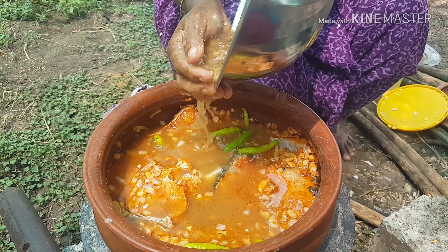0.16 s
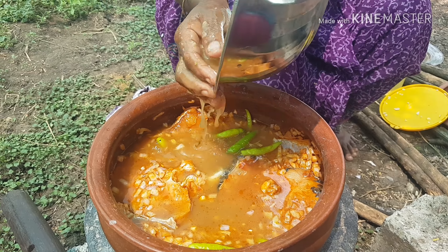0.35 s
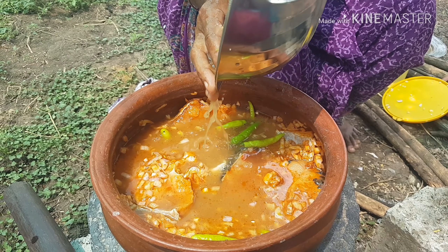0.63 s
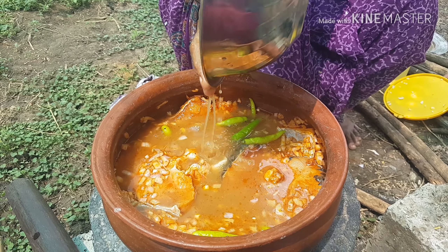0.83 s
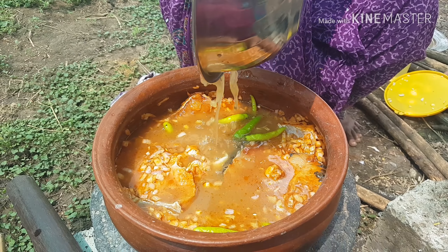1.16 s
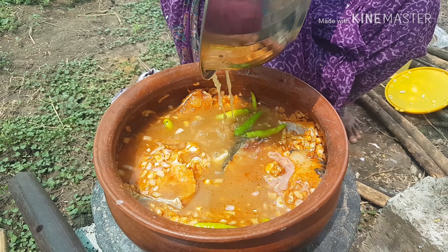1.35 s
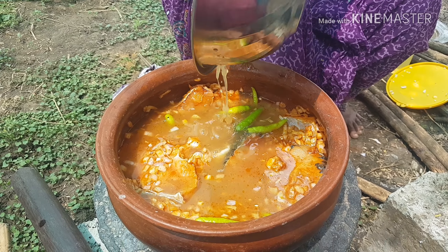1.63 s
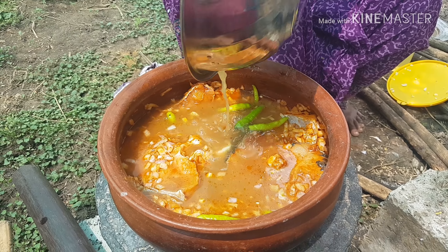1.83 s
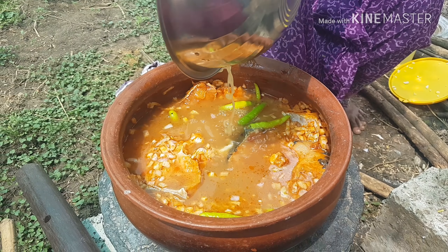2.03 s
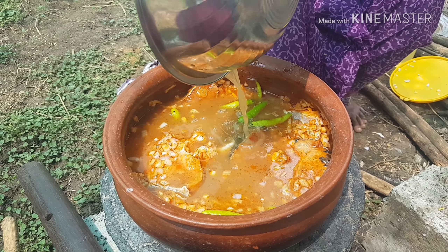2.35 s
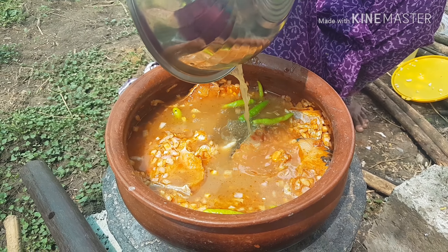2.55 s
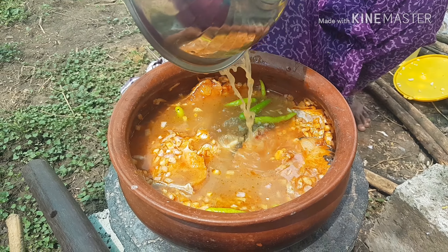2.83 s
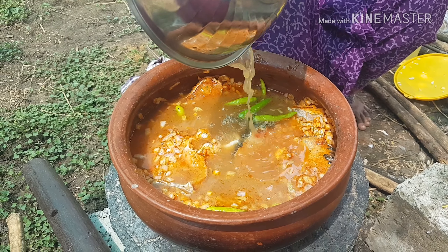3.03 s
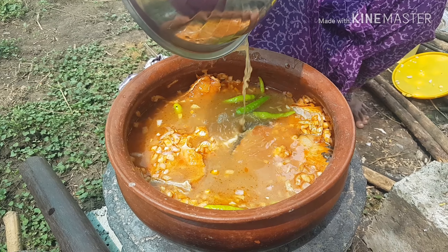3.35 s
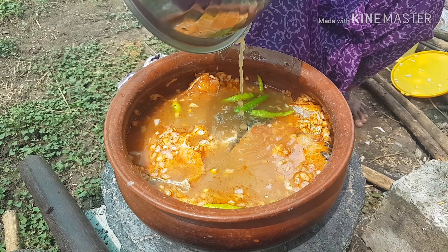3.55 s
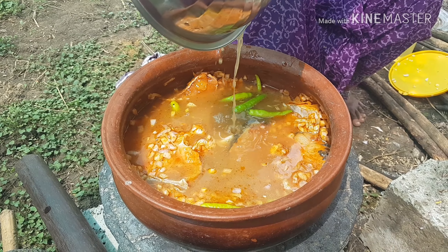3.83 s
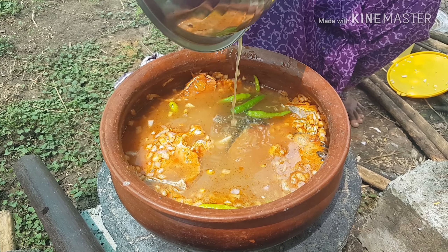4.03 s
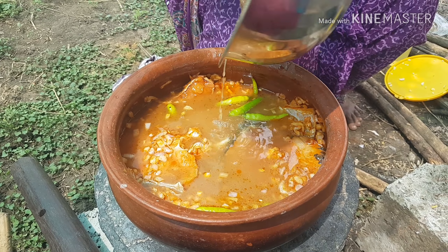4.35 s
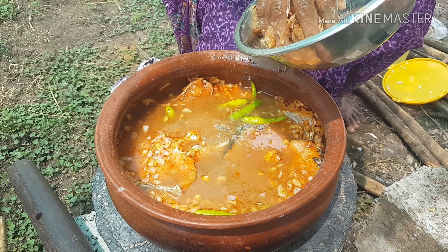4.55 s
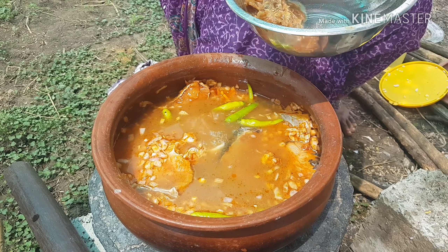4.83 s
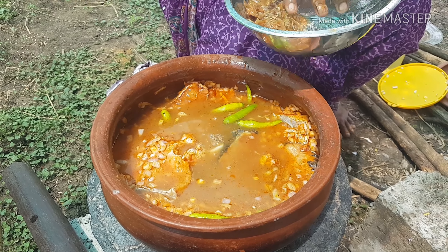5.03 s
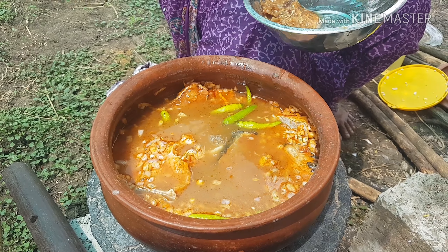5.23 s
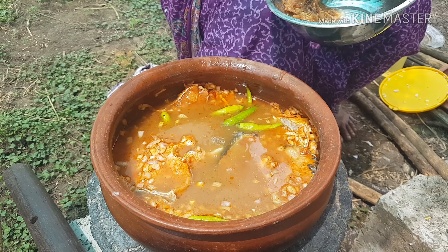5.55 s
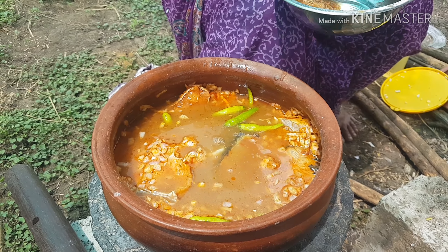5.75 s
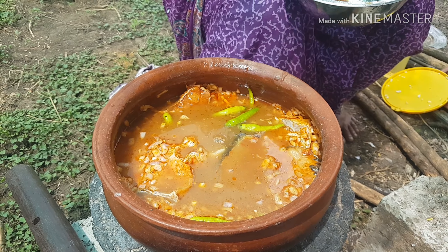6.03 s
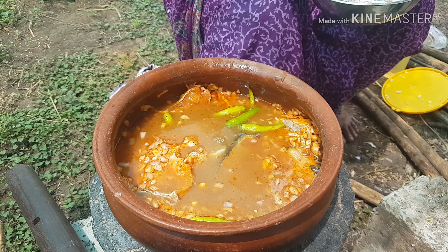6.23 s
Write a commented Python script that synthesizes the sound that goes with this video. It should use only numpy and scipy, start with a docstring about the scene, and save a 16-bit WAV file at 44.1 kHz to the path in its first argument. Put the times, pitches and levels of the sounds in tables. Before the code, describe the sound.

Thin broth dribbles and plips from a steel bowl into a full clay pot outdoors, with one sharp snap, crows, small birds and a low engine.

```python
"""Broth dribbled into a clay pot

Outdoors, close to two microphone ports: thin broth dribbles from a steel bowl into a clay pot.
Drops splash as rising noise bands and trap bubbles that ring as dying sines; the bowl is clinked twice.
At the left port something snaps (gliding tones) and scrapes (noise ringing the casing).
Far off, crows caw (pulses, hoarse noise bands), small birds whistle (narrow noise) and an engine
throbs low (uneven firings through resonances) over the hiss of the yard (random spectra)."""
import sys
import numpy as np
from scipy import signal
from scipy.fft import rfft, irfft
from scipy.io import wavfile
from scipy.ndimage import uniform_filter1d

SR = 44100
rng = np.random.default_rng(int(sys.argv[2]) if len(sys.argv) > 2 else 0)


def voltage_ratio(decibels):
    """Convert decibels (scalar or array-like) to amplitude ratios, 20 dB per decade."""
    exponent = np.asarray(decibels, float) / 20
    return 10 ** exponent


def unload_audio(sound):
    """Save the sound as a 16-bit wav file, at the path given as the first command line argument."""
    columns = np.transpose(np.atleast_2d(sound))
    # keep every value between -1 and 1, then stretch to whole-number steps
    steps = np.round(np.clip(columns, -1, 1) * 32767)
    wavfile.write(sys.argv[1], SR, steps.astype(np.int16))


N = 282240

# spectrum of the yard's hiss: (frequency [Hz], relative level [dB])
YARD_SPECTRUM = [(82, -47), (140, 0.5), (178, -8), (328, -7), (433, -21), (684, -12.5), (939, -18.5),
                 (1920, -18), (2430, -15), (3550, -7), (7380, -36), (14200, -31), (16000, -43)]
# likeness of the yard at the two ports, negative where opposed: (frequency [Hz], likeness [-1 to 1])
YARD_LIKENESS = [(60, 0.65), (180, 1), (550, 0.51), (1650, -0.27), (4970, -0.012), (15000, 0.12)]
# left-right tilt of the yard, before each port's share: (frequency [Hz], tilt [dB])
YARD_TILT = [(60, -25), (130, 2), (290, 0), (640, 6.5), (1410, -1.5), (3100, 6), (6820, -0.5), (15000, -2)]
# slow swell of the yard, before weighting by frequency: (time [s], bass [dB], everything higher [dB])
BREEZE = [(0, 5, 3.5), (.8, -4.5, -5), (1.6, -1, 2), (2.4, 1, 3), (3.2, 0.5, 1.5), (4.0, 1, 3.5),
          (4.8, 4, 0.5), (5.6, -0.5, 1.5), (6.4, 3, 1.5)]
YARD_DB = -56.5  # ahead of the port tilt

# surges of the distant engine: (middle [s], level [dB])
ENGINE_SURGES = [(.12, -58.5), (.6, -57.5), (1.12, -62.5), (1.68, -54), (1.98, -49.5), (2.27, -54),
                 (2.48, -54), (2.75, -49), (3.05, -56.5), (3.35, -50.5), (3.65, -69), (4.0, -52),
                 (4.39, -52.5), (4.68, -57.5), (4.97, -57), (5.62, -51.5), (5.98, -56.5), (6.27, -50)]
SURGE_S, IDLE_DB = 0.46, -62.5
# soft low bumps of handling: (middle [s], length [s], level [dB])
HANDLING_BUMPS = [(.208, 0.0255, -48), (.48, 0.17, -59.5)]

# caws of far crows: (middle [s], length [s], level [dB])
FAR_CAWS = [(.8, 1, -61.5), (1.08, 0.36, -62), (1.85, 1, -53), (2.45, 0.87, -59), (3.35, 0.67, -62),
            (3.75, 1, -66), (5.1, 0.9, -67.5), (6.2, 1, -61)]
# caws of the nearest crow: (start [s], length [s], pitch at the ends of a whole caw [Hz],
# pitch at its top [Hz], level before fade and yard echo [dB])
NEAR_CAWS = [(0.618, .26, 466, 507, -60.5), (0.998, 0.057, 399, 802, -59.5), (1.387, 0.048, 439, 678, -58),
             (4.832, 0.26, 394, 624, -50.5)]
# resonances of the crow's throat: (centre [Hz], width of each of two passes [Hz], level [dB])
CROW_THROAT = [(1080, 270, -25), (2090, 230, 1), (2550, 300, -13), (3100, 440, -14), (3850, 560, -12.5)]
CAW_S = 0.22  # a caw at least this long arches up and down; shorter ones break off on the way up
CAW_LEAN, CAW_POINT = 0.89, 1.3  # the arch tops a little before its middle and is narrow
CAW_FADE_DB = -6  # per CAW_S
# a small bird's nearly level whistle: (start [s], length [s], level before yard echo [dB])
WHISTLES = [(1.41, .15, -64), (1.828, 0.21, -57), (2.374, 0.13, -62), (4.446, 0.19, -63),
            (5.354, 0.21, -64), (5.919, 0.25, -60)]
WHISTLE_HZ, WHISTLE_END_HZ = 4480, 4230
# another bird's falling chirp: (start [s], level before yard echo [dB])
CHIRPS = [(4.62, -67), (5.119, -59), (5.45, -60.5), (5.54, -62), (5.62, -60.5), (5.83, -70), (6.17, -55.5)]
CHIRP_S, CHIRP_HZ, CHIRP_END_HZ = 0.1, 3900, 2920

# clinks on the bowl, levels before echo: (time [s], mode level [dB], pitch factor [ratio],
# hiss level [dB], hiss t60 [s], hollow body tone level [dB])
CLINKS = [(5.037, -41.5, 1.06, -40.5, 0.064, -46.5), (6.038, -34, 1.0, -36.5, 0.078, -78)]
# modes of the steel bowl: (pitch before the clink's factor [Hz], level against the clink [dB], t60 [s])
BOWL_MODES = [(4245, -2, 0.09), (5900, -9, .05), (7110, 2, 0.03), (11000, -5, .03)]
# contacts at the left port: (time [s], level [dB], rise [s], t60 [s], snap share [0 scrape to 1 snap])
CONTACTS = [(0.2897, 0.3, 0.00021, 0.002, 0.82), (0.2885, -14, 0.0016, 0.013, 0.2),
            (0.2955, -13, 0.004, 0.025, 0), (0.3035, -13, 0.002, 0.03, 0), (0.32, -33.5, 0.0024, 0.034, 0),
            (2.011, -38, 0.0012, 0.06, 0), (2.019, -25, 0.001, 0.02, 0), (2.0245, -23, 0.001, 0.02, 0)]
# resonances of the casing: (centre [Hz], width of each of two passes [Hz], relative level [dB])
CASING = [(118, 90, 1), (500, 1520, -4), (1260, 420, 7), (2800, 7900, -17), (8000, 7100, -40)]
SCRAPE_TOP_HZ = 6000  # treble edge of a scrape at 0 dB; softer ones are duller

# large bubbles trapped by drops: (time [s], level before echo [dB], starting pitch [Hz])
BUBBLES = [(0.138, -32, 1560), (0.184, -40, 2200), (0.367, -47.5, 760), (0.399, -27, 1690),
           (0.608, -43, 2800), (0.787, -41.5, 1400), (0.887, -35.5, 2435), (0.805, -51.5, 860),
           (0.902, -45, 1146), (1.14, -49.5, 1084), (1.25, -34.5, 3000), (1.312, -43.5, 2650),
           (1.337, -46.5, 1080), (1.367, -37, 1500), (1.388, -39.5, 1227), (1.593, -35.5, 1340),
           (1.621, -37.5, 2700), (1.669, -32, 1510), (1.692, -32.5, 966), (1.747, -27.5, 2990),
           (1.774, -32, 2520), (1.802, -35.5, 3150), (1.85, -35.5, 1220), (1.832, -39, 2580),
           (1.89, -39, 2560), (1.923, -40.5, 1095), (2.158, -44, 2540), (2.173, -29, 1185),
           (2.217, -29.5, 1920), (2.225, -25.5, 2550), (2.332, -38, 1236), (2.721, -27.5, 2640),
           (2.849, -37.5, 2790), (3.154, -30.5, 1975), (3.186, -44.5, 2650), (3.205, -44, 1450),
           (3.29, -37, 2520), (3.333, -33, 1870), (3.348, -33.5, 2650), (3.374, -31.5, 2550),
           (3.491, -36, 2480), (3.549, -37.5, 2560), (3.643, -46, 1530), (3.669, -37, 1144),
           (3.706, -38.5, 920), (3.716, -35, 2030), (3.742, -34, 864), (3.782, -34.5, 1060),
           (3.84, -41.5, 1074), (3.851, -39.5, 2410), (3.88, -40.5, 1200), (3.895, -35.5, 1002),
           (3.989, -42.5, 1850), (4.102, -34, 1730), (4.118, -37, 1890), (4.212, -31, 1116),
           (4.311, -24, 1990), (4.345, -45, 1070), (4.393, -38, 1680), (4.411, -45, 1030),
           (4.437, -46, 1077), (4.454, -42.5, 2490), (4.52, -38, 1152)]
# large splashes, levels before echo: (time [s], level [dB], nominal band centre [Hz], spray level [dB])
SPLASHES = [(0.0462, -38.5, 10100, -53.5), (0.0646, -33.5, 4530, -64), (0.1377, -42, 4300, -44),
            (0.2468, -57, 7650, -39.5), (0.399, -57.5, 7100, -37.5), (0.44, -44.5, 6060, -60),
            (0.555, -66.5, 7360, -62), (0.602, -43, 6820, -63), (0.632, -54.5, 10300, -36.5),
            (0.7014, -40.5, 6800, -66.5), (0.7424, -55, 10660, -47.5), (1.042, -40.5, 5870, -38.5),
            (1.2182, -43, 4530, -40.5), (1.296, -36, 6130, -39), (1.3662, -42, 8000, -44),
            (1.4111, -32, 6350, -47), (1.4357, -31.5, 7700, -70), (1.5966, -50, 8100, -41.5),
            (1.7706, -29.5, 4540, -53), (1.806, -28.5, 5650, -63), (1.8364, -31, 4500, -39),
            (1.923, -30.5, 6680, -37.5), (2.1225, -33, 4170, -70), (2.205, -43.5, 9800, -50),
            (2.2202, -36, 6900, -32), (2.288, -28, 6300, -65), (2.3598, -38, 4550, -43),
            (2.798, -37, 5600, -47), (2.826, -36, 5440, -47), (2.8623, -33, 6000, -62),
            (2.8921, -32.5, 4900, -72), (3.0151, -36.5, 5200, -39), (3.0686, -36, 7300, -64),
            (3.147, -38, 5100, -57), (3.2232, -49, 10100, -67), (3.3281, -31.5, 4880, -38.5),
            (3.4177, -38, 4630, -70), (3.496, -39.5, 8200, -44), (3.5558, -33.5, 4560, -52),
            (3.587, -44, 13500, -47), (3.657, -33, 6300, -70), (3.7908, -44, 7900, -51),
            (3.8125, -33.5, 4470, -38), (3.848, -38, 7400, -65), (3.8784, -41, 4650, -64),
            (3.9544, -42.5, 7750, -61), (4.0573, -37.5, 4400, -63), (4.255, -46, 5000, -44.5),
            (4.4708, -42, 7860, -51)]
# colour of spray noise: (frequency [Hz], relative level [dB])
SPRAY_SPECTRUM = [(900, -18.5), (3000, -5.5), (5000, 2.5), (7500, 2.5), (9000, -12.5), (12000, 1.5),
                  (15000, -10.5)]
# strength of the fine droplets, before each kind's own gain: (time [s], level [dB])
FLOW = [(0.0, -67), (0.28, -60.5), (1.07, -80), (1.43, -68.5), (2.12, -69.5), (2.49, -71), (2.94, -69),
        (3.74, -66.5), (4.65, -79), (6.4, -110)]
# left-right tilt of the pot at the two ports, before each port's share: (frequency [Hz], tilt [dB])
POT_TILT = [(60, -9), (110, -22), (200, -33), (380, -4), (700, -2), (1290, -3.5), (2380, 14.5),
            (4400, -7.5), (8120, -9), (15000, -1)]
SMALL_BUBBLE_DB, SMALL_SPLASH_DB = 17.5, 7.5  # loudest small drop over FLOW
SMALL_SPRAY_DB = -13.5  # spray against its own splash
SMALL_SPREAD_DB, CLUSTER_S = 12, 0.07  # range of small drops; farthest from a large one, either way
SPRAY_BANDS = 7
PINCH_HZ = 2392  # bubbles that pinch off lean towards this pitch


def evened(x):
    """Scales to rms 1."""
    return x / np.sqrt(np.mean(x ** 2) + 1e-20)


def read(points, hz):
    """Reads a spectrum on a log frequency axis."""
    f, value = np.transpose(points)
    return np.interp(np.log(hz + 1), np.log(f + 1), value)


def add(mix, s, sound):
    """Mixes a sound in at time s."""
    part = mix[round(s * SR):][:len(sound)]
    part += sound[:len(part)]


def colour(x, points, share=1):
    """Filters by a share of a spectrum in dB."""
    return irfft(rfft(x) * voltage_ratio(share * read(points, np.fft.rfftfreq(N, 1 / SR))), N)


def resonate(x, hz, width, passes=1):
    """Each pass shifts the frequency or curve hz down to zero, smooths, and shifts back."""
    turn = np.exp(2j * np.pi * np.cumsum(hz * np.ones(len(x))) / SR)
    r = np.exp(-np.pi * width / SR)
    for _ in range(passes):
        x = 2 * (turn * signal.lfilter([1 - r], [1, -r], x / turn)).real
    return x


def fading(rise, t60):
    """Soft start, exponential end, peak 1."""
    t60 = max(t60, 5e-4)
    t = np.arange(int(t60 * SR)) / SR
    shape = (1 - np.exp(-t / max(rise, 1e-4))) * voltage_ratio(-60 * t / t60)
    return shape / shape.max()


def dying_tone(hz, t60, climb, rise=0.00012):
    """A dying sine whose pitch moves by the fraction climb: a bubble's rises as it nears the surface."""
    shape = fading(rise, t60)
    pitch = hz * (1 + climb * np.linspace(0, 1, len(shape)))
    return shape * np.sin(2 * np.pi * np.cumsum(pitch) / SR)


def scattered(x, first_s, t60, count):
    """Two sets of sparse decaying echoes of random sign, energy 1."""
    taps = np.zeros((2, int((first_s + t60) * SR)))
    at = first_s + t60 * rng.random((2, count))
    strength = rng.choice([-1., 1.], at.shape) * voltage_ratio(-60 * (at - first_s) / t60)
    np.put_along_axis(taps, (at * SR).astype(int) - 1, strength, 1)
    taps /= np.linalg.norm(taps, axis=1, keepdims=True)
    return signal.oaconvolve(x[None], taps, axes=1)[:, :N]


def swells(rows, rest_db):
    """Rounded humps over a resting level."""
    out = np.full(N, voltage_ratio(rest_db))
    for middle, length, db in rows:
        add(out, max(middle - length / 2, 0), voltage_ratio(db) * np.hanning(int(length * SR)) ** 2.7)
    return out


def yard():
    """Hiss from random short-time spectra with drifting patches; bass and the rest swell on their own."""
    frames, hz = N // 256 + 5, np.fft.rfftfreq(1024, 1 / SR)
    a, b, c, d, patches = rng.standard_normal((frames, 513, 5)).T
    patches = evened(uniform_filter1d(uniform_filter1d(patches, 12, 0), 14, 1))
    s, low_db, high_db = np.transpose(BREEZE)
    t = np.arange(frames) * 256 / SR
    low = 1 / (1 + (hz[:, None] / 500) ** 2)
    breeze_db = low * np.interp(t, s, low_db) + (1.5 - low) * np.interp(t, s, high_db)
    same = np.clip(read(YARD_LIKENESS, hz), -1, 1)[:, None]
    left = a + 1j * b
    right = same * left + np.sqrt(1 - same ** 2) * (c + 1j * d)
    z = np.array([left, right]) * voltage_ratio(read(YARD_SPECTRUM, hz)[:, None] + 2.5 * patches + breeze_db)
    x = voltage_ratio(YARD_DB) * evened(signal.istft(z, nperseg=1024, noverlap=768)[1][:, :N])
    return np.array([colour(x[0], YARD_TILT, 0.21), colour(x[1], YARD_TILT, -1.5)])


def engine():
    """Uneven firings, about thirty a second, thump low resonances over a wavering drone, alike at both ports."""
    rate = 30 * (1 + 14.0 * uniform_filter1d(rng.standard_normal(N), 2000))
    firing = np.diff(np.floor(np.cumsum(rate) / SR), prepend=0) * voltage_ratio(1.03 * rng.standard_normal(N))
    rumble = evened(resonate(rng.standard_normal(N), 92, 52))
    drive = evened(resonate(firing, 69.7, 100)) + 0.75 * rumble
    throb = evened(resonate(resonate(drive, 85.0, 77), 78.0, 73))
    drone = evened(resonate(rng.standard_normal(N), 40.6, 11.0, passes=2))
    surges = swells([(s, SURGE_S, db) for s, db in ENGINE_SURGES], IDLE_DB)
    return surges * throb + voltage_ratio(-61.5) * drone


def bumps():
    """Handling as short humps of low noise, alike at both ports."""
    return swells(HANDLING_BUMPS, -99) * evened(resonate(rng.standard_normal(N), 190, 260, passes=2))


def far_crows():
    """Distance blurs the caws to humps of a hoarse noise band, separate at each port."""
    caws = [evened(resonate(n, 1840, 760, passes=3)) for n in rng.standard_normal((2, N))]
    return swells(FAR_CAWS, -69.0) * np.array(caws)


def near_crow():
    """Jittered pulses of arching pitch pass through throat resonances and scatter in the yard."""
    crow = np.zeros(N)
    for s, length, low_hz, top_hz, db in NEAR_CAWS:
        t = np.arange(0, length, 1 / SR)
        arch = np.abs(np.sin(np.pi * (t / max(length, CAW_S)) ** CAW_LEAN)) ** CAW_POINT
        jitter = 1 + 0.263 * uniform_filter1d(rng.standard_normal(len(t)), 100)
        turns = np.cumsum((low_hz + (top_hz - low_hz) * arch) * jitter) / SR
        folds = sum(np.cos(2 * np.pi * k * turns) for k in range(1, 10))
        throat = sum(voltage_ratio(d) * resonate(folds, f, w, passes=2) for f, w, d in CROW_THROAT)
        level = voltage_ratio(db + CAW_FADE_DB * t / CAW_S) * signal.windows.tukey(len(t), .4)
        add(crow, s, level * evened(throat))
    return (1.33 * crow + .5 * scattered(crow, 0.0063, 0.3, count=500)) * voltage_ratio([[-2], [2]])


def small_birds():
    """Whistles and chirps are noise narrowed around a falling pitch, scattered by the yard."""
    small = np.zeros(N)
    notes = [(s, length, WHISTLE_HZ, WHISTLE_END_HZ, db) for s, length, db in WHISTLES]
    notes += [(s, CHIRP_S, CHIRP_HZ, CHIRP_END_HZ, db) for s, db in CHIRPS]
    for s, length, start_hz, end_hz, db in notes:
        glide = np.linspace(start_hz, end_hz, int(length * SR))
        width = 15 + 1.0 * abs(start_hz - end_hz)  # chirps, which fall further, are hoarser
        tone = evened(resonate(rng.standard_normal(len(glide)), glide, width, passes=2))
        add(small, s, voltage_ratio(db) * tone * np.hanning(len(glide)))
    return (0.55 * small + 0.64 * scattered(small, .005, 0.44, count=500)) * voltage_ratio([[-4], [3]])


def clinks():
    """Modes of the steel bowl, its hollow body tones and a bright hiss of the contact, with echoes."""
    tones, hiss = np.zeros(N), np.zeros(N)
    for s, db, factor, hiss_db, t60, body_db in CLINKS:
        for hz, mode_db, ring in BOWL_MODES:
            add(tones, s, voltage_ratio(db + mode_db) * dying_tone(hz * factor, ring, 0))
        add(tones, s - .004, voltage_ratio(body_db) * dying_tone(560, 0.29, -0.12, 0.0012))
        add(tones, s - .004, voltage_ratio(body_db - 1) * dying_tone(1020, 0.039, -0.1, 0.0018))
        add(hiss, s - .002, voltage_ratio(hiss_db) * fading(0.0061, t60))
    bowl = tones + hiss * evened(colour(rng.standard_normal(N), SPRAY_SPECTRUM, 0.49))
    early = scattered(bowl, 0.00064, 0.0083, count=30)
    late = scattered(bowl, 0.003, 0.27, count=500)
    return (0.47 * bowl + 0.6 * early + voltage_ratio(-16.5) * late) * voltage_ratio([[-5], [3]])


def contacts():
    """A snap is a sharp pull and slower push with a tick and low thump; scraping noise rings the casing."""
    scrape, left, noise = np.zeros(N), np.zeros(N), rng.standard_normal(N)
    for s, db, rise, t60, snap in CONTACTS:
        shape = fading(rise, t60)
        keep = np.exp(-2 * np.pi * SCRAPE_TOP_HZ * voltage_ratio(0.43 * db) / SR)
        grit = evened(signal.lfilter([1], [1, -keep], noise[round(s * SR):][:len(shape)]))
        add(scrape, s, voltage_ratio(db) * (1 - snap) * shape * grit)
        add(left, s, -voltage_ratio(db) * snap * dying_tone(1700, t60, -1.1, rise))  # pull and push
        add(left, s + 0.00045, -voltage_ratio(db - 6.5) * snap * dying_tone(12000, 0.00031, 0, .0001))  # tick
        add(left, s + 0.0001, voltage_ratio(db - 6.5) * snap * dying_tone(403, 0.0051, -0.99, 0.00033))  # thump
    left += sum(voltage_ratio(db - 4) * resonate(scrape, hz, width, passes=2) for hz, width, db in CASING)
    return left * voltage_ratio([[0], [-45]])


def small_drops(large, level_db, low_hz, high_hz, count):
    """Random drops near the large ones: rows of time, level after the flow, and pitch."""
    which, apart, size, pitch = rng.random((count, 4)).T
    beside = np.transpose(large)[0][(which * len(large)).astype(int)]
    s = np.abs(beside + CLUSTER_S * (2 * apart - 1)) + .002
    db = np.interp(s, *np.transpose(FLOW)) + level_db - SMALL_SPREAD_DB * size
    return np.c_[s, db, low_hz * (high_hz / low_hz) ** pitch]


def throw(spray, s, db, shape):
    """Spray of one impact: bands from dull to bright in uneven shares."""
    for band, share in zip(spray, rng.random(SPRAY_BANDS)):
        add(band, s, voltage_ratio(db - 14 * share) * shape)


def bubbles(spray):
    """Trapped air rings as a climbing sine; quieter bubbles pinch off; the impact adds to the spray."""
    rings = np.zeros(N)
    for s, db, hz in np.r_[BUBBLES, small_drops(BUBBLES, SMALL_BUBBLE_DB, 1000, 2900, count=120)]:
        t60 = 0.021 * (2000 / hz) ** 0.8 * rng.uniform(0.8, 1.2)  # large bubbles ring longer
        add(rings, s, voltage_ratio(db) * dying_tone(hz, t60, 0.018 + 0.16 * rng.random(), 0.00027))
        for near_hz in (hz, PINCH_HZ):
            later, weaker, higher = rng.random(3)
            pinched = dying_tone(near_hz * (.85 + .35 * higher), .018, .12, .001)
            add(rings, s + .012 * later, voltage_ratio(db - 9 - 10 * weaker) * pinched)
        throw(spray, s - .001, db - 16, fading(0.00026, 0.011))  # the impact that opens the cavity
    return rings


def splashes(spray):
    """A drop hitting the surface gives a short noise band of rising pitch, and adds to the spray."""
    out, noise = np.zeros(N), rng.standard_normal(N)
    drops = small_drops(SPLASHES, SMALL_SPLASH_DB, 3250, 11700, count=50)
    for s, db, hz, spray_db in np.r_[SPLASHES, np.c_[drops, drops[:, 1] + SMALL_SPRAY_DB]]:
        shape = fading(0.00047, 0.0079 + 0.016 * rng.random())
        rising = hz * np.linspace(.97, 1.15, num=len(shape))
        band = evened(resonate(noise[round(s * SR):][:len(shape)], rising, 436))
        add(out, s, voltage_ratio(db - 5.0) * shape * band)
        throw(spray, s - .0005, spray_db, shape)
    return out


def fine_droplets(spray):
    """Random tiny bubbles plip as climbing sines; dry ticks, each with its own colour, join the spray."""
    flow = voltage_ratio(np.interp(np.arange(N) / SR, *np.transpose(FLOW)))
    size = voltage_ratio(5.5 * np.minimum(rng.exponential(1, (2, N)), 4))
    centre = rng.uniform(0, SPRAY_BANDS, N) - np.arange(SPRAY_BANDS)[:, None]
    ticks = size[0] * (rng.random(N) < 240 / SR) * np.exp(-(centre / 0.9) ** 2)  # 240 a second
    ticking = signal.oaconvolve(ticks, fading(0.00034, 0.0029)[None], axes=1)[:, :N]
    spray += voltage_ratio(3) * flow * evened(ticking)
    plips = size[1] * (rng.random(N) < 140 / SR)  # 140 a second
    kind, small = rng.integers(0, 12, N), np.zeros(N)
    for k, hz in enumerate(np.geomspace(1100, 3400, num=12)):
        small += signal.oaconvolve(plips * (kind == k), dying_tone(hz, 35 / hz, 0.27, 0.00037))[:N]
    return voltage_ratio(-16.5) * flow * evened(small)


def pouring():
    """Bubbles, splashes, droplets and their spray noise, echoed by the wall of the pot."""
    spray = np.zeros((SPRAY_BANDS, N))  # envelope of each noise band
    wet = bubbles(spray) + splashes(spray) + fine_droplets(spray)
    air = evened(colour(rng.standard_normal(N), SPRAY_SPECTRUM))
    bands = [resonate(air, hz, 3000, passes=2) for hz in np.linspace(2200, 14500, num=SPRAY_BANDS)]
    direct = wet + (spray * bands).sum(0)
    early = voltage_ratio(-1.5) * scattered(direct, 0.00025, 0.0119, count=40)
    late = voltage_ratio(-16.5) * scattered(direct, 0.014, 0.23, count=400)
    left, right = direct + early + late
    right = np.roll(right, shift=4)  # reaches the right port four samples later
    return np.array([colour(left, POT_TILT, 0.75), colour(right, POT_TILT, -0.4)])


def scene():
    """All sources at the two ports."""
    birds = far_crows() + near_crow() + small_birds()
    return yard() + engine() + bumps() + birds + clinks() + contacts() + pouring()


def low_pass(x):
    """Removes everything above the highest recorded frequency."""
    return signal.sosfilt(signal.butter(12, 16500, fs=SR, output="sos"), x)


def record(dry):
    """The microphone loses the deepest bass, below 32 Hz."""
    high_pass = signal.butter(N=2, Wn=32, btype="high", fs=SR, output="sos")
    return low_pass(signal.sosfilt(high_pass, dry))


dry = scene()
out = record(dry)
unload_audio(out)
```